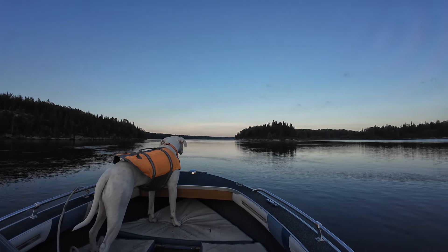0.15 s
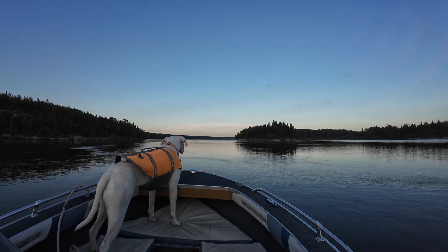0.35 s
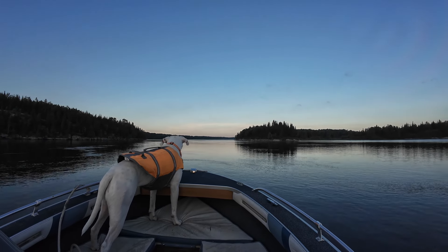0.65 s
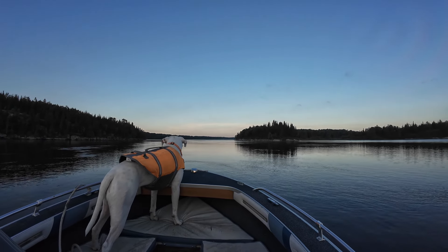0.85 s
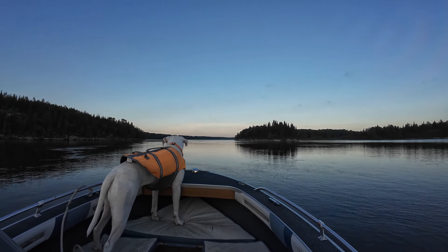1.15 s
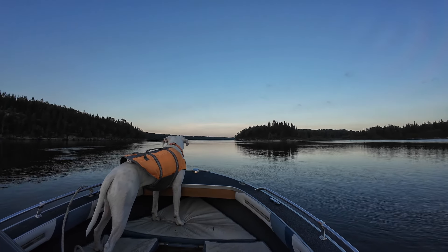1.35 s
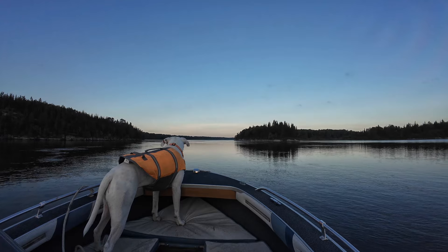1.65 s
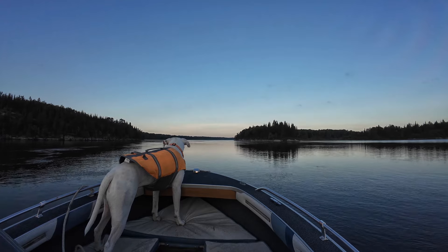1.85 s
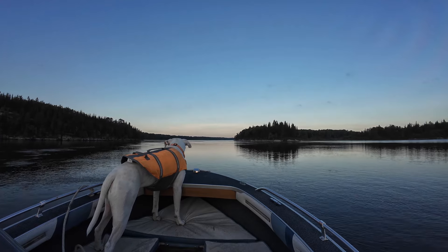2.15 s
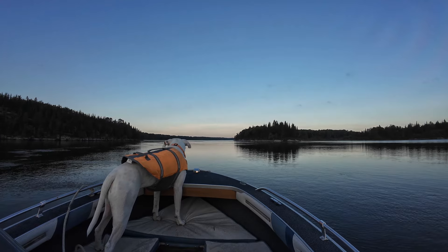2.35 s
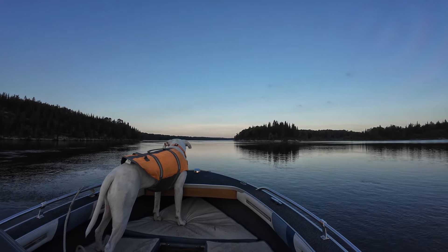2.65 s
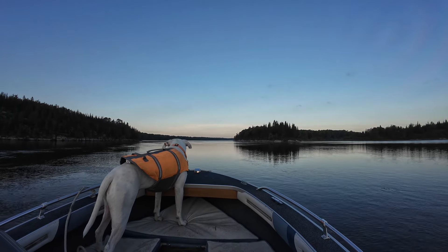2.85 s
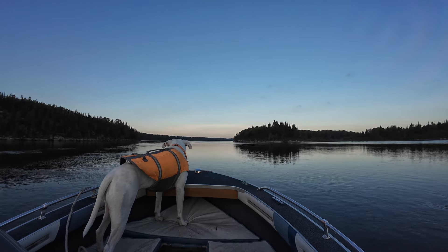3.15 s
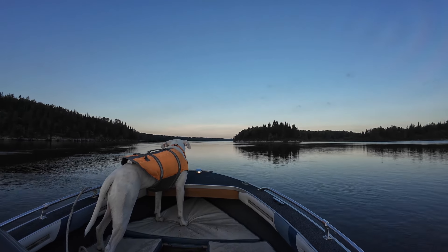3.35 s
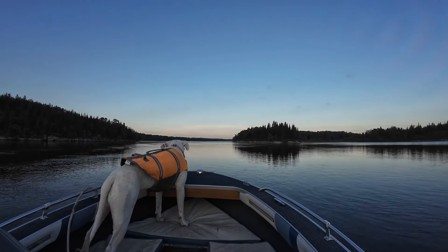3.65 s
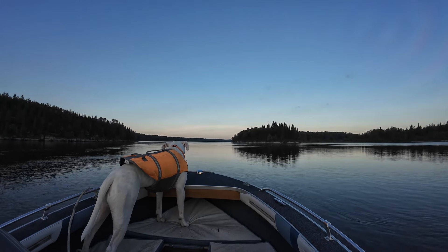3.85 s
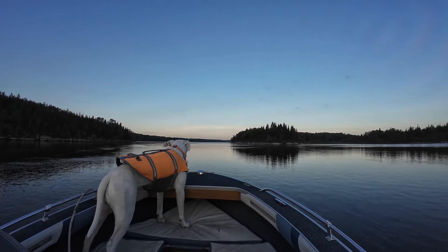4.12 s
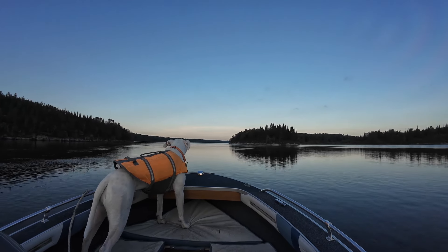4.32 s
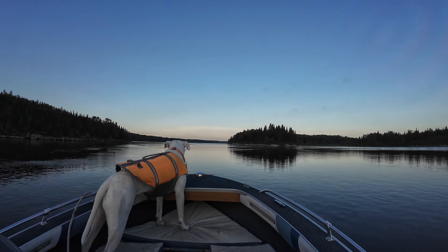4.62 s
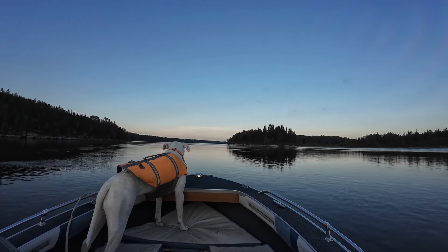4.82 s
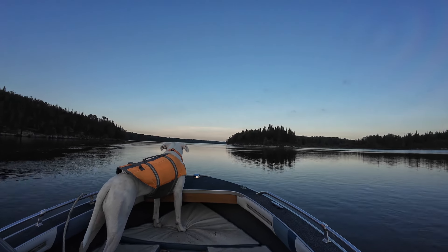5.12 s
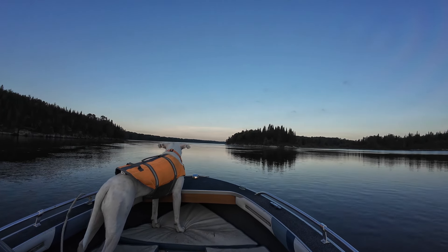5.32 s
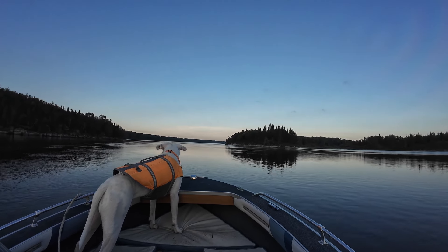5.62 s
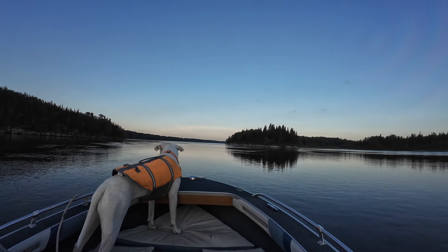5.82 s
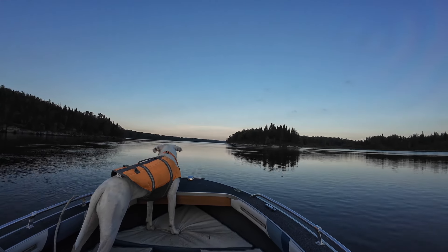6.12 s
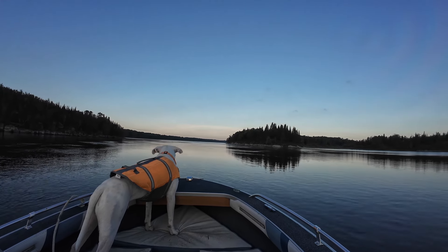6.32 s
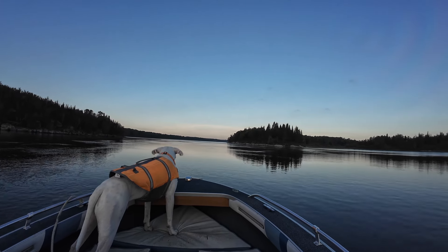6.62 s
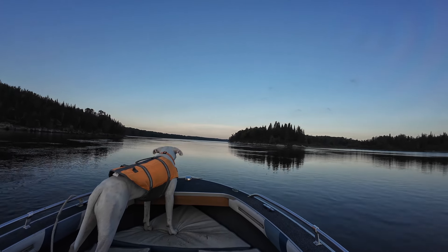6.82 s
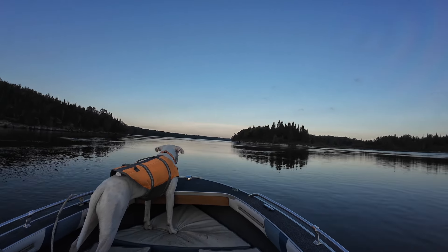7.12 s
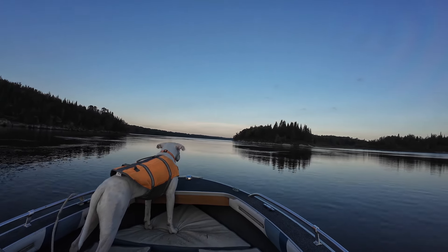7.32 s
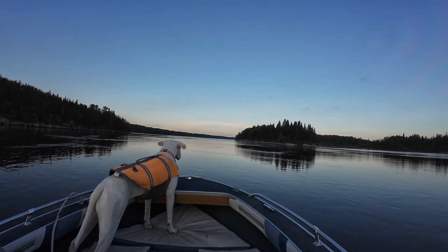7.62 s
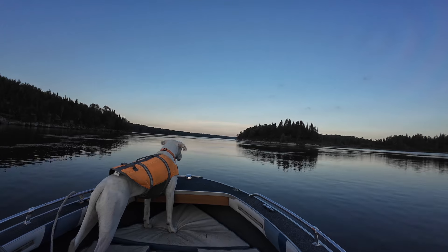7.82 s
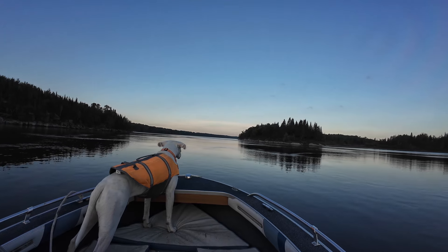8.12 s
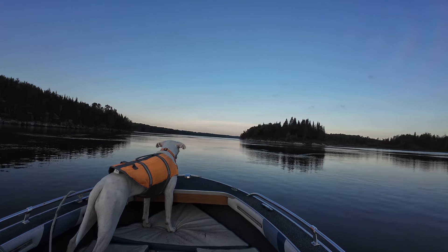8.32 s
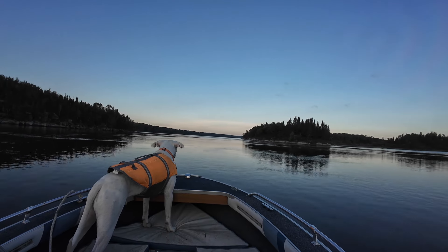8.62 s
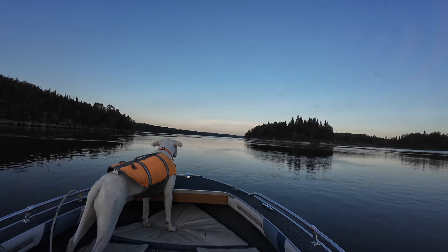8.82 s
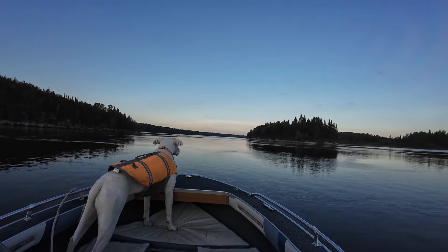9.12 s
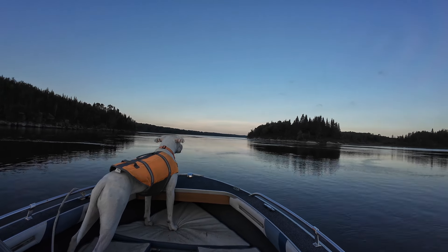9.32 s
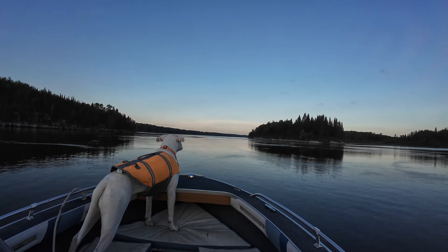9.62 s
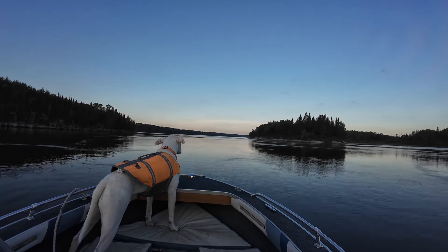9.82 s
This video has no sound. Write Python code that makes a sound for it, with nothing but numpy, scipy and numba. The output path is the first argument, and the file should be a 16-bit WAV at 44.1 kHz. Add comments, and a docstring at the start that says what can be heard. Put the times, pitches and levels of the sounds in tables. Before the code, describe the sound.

Wind buffets the microphone on a small boat as its outboard engine hums, rises in pitch and levels off, with water rushing past.

```python
"""Small outboard boat on a calm lake

The motor's firing tone climbs as the throttle opens, and a hull panel hums along at low speed.
Hull wash and spray hiss over the low roar of the wake, with one splash at the bow. Head wind
rumbles and pops on the microphone amidships; motor and water dip under the hardest gusts,
and a limiter holds the peaks."""
import sys
import numpy as np
from scipy import signal
from scipy.fft import rfft, irfft, next_fast_len
from scipy.io import wavfile
from scipy.ndimage import uniform_filter1d
from numba import njit

SR = 44100
rng = np.random.default_rng(int(sys.argv[2]) if len(sys.argv) > 2 else 0)


def waveform_to_disk(signal):
    """Save audio, clipped to [-1, 1], as 16-bit WAV at the path in sys.argv[1]."""
    frames = np.transpose(np.atleast_2d(signal))
    scaled = np.clip(frames, -1, 1) * 32767
    samples = np.round(scaled).astype(np.int16)
    wavfile.write(sys.argv[1], SR, samples)


N = 439236

# water hiss along the hull: t/s, wash/dB, spray/dB
HISS_LEVELS = [(0.0, -38, -56), (0.02, -36.5, -54), (0.05, -38, -53), (0.14, -29.5, -49),
               (0.19, -38.5, -58), (0.27, -42.5, -60), (0.33, -33.5, -52), (0.39, -38, -56),
               (0.44, -32, -50.5), (0.91, -33.5, -48), (2.61, -35, -48.5), (3.41, -36.5, -51.5),
               (3.55, -46, -60), (3.58, -41, -53), (3.66, -34.5, -50), (3.72, -39, -53.5), (3.94, -34, -49),
               (3.96, -34.5, -48), (4.41, -34, -51.5), (4.47, -36.5, -49), (4.52, -41, -56),
               (4.55, -40, -50), (4.58, -39, -55), (4.66, -43, -61), (4.82, -44.5, -53.5), (4.85, -43, -53),
               (4.88, -45, -58), (4.94, -37, -49), (5.1, -39, -49), (5.13, -37, -50), (5.16, -40, -54),
               (5.27, -42, -58), (5.35, -46, -52), (5.41, -33.5, -47), (5.6, -37.5, -47.5),
               (5.63, -41, -50.5), (5.66, -39, -59), (5.69, -40, -48), (5.77, -36, -45.5),
               (6.02, -37, -45.5), (6.13, -34, -43.5), (8.57, -36, -44.5), (9.93, -35.5, -47.5),
               (9.96, -32, -42)]


def motor():
    """Multiples of the firing rate, wavering with the load on the propeller, plus a humming hull panel."""
    # the throttle opening: t/s, firing rate/Hz, firing tone/dB, octave/dB
    throttle = [(0.0, 87.3, -11.5, -34), (0.4, 89.7, -16, -27.5), (0.8, 92, -15.5, -32),
                (1.2, 92.4, -20.5, -34), (1.6, 93.9, -17, -37), (2.0, 94.7, -15, -42),
                (2.4, 98.8, -16, -46), (2.8, 106.5, -15, -39), (3.2, 110.5, -14.5, -47),
                (3.4, 110.4, -14.5, -38), (3.6, 113, -13.5, -42), (4.0, 117.3, -13, -48),
                (4.4, 120.1, -14, -46), (4.6, 120.5, -27, -38), (4.8, 119.2, -39, -33),
                (5.0, 123, -9.5, -47), (5.2, 124.3, -13, -34.0), (5.6, 126, -14, -36),
                (6.0, 126.3, -12.5, -27.5), (6.4, 126.6, -10.5, -28.5), (6.8, 126.9, -9.5, -27.0),
                (7.2, 127.4, -9, -24.5), (7.6, 127, -10.5, -32), (8.0, 127, -11.0, -34),
                (8.4, 128.7, -11.5, -30.5), (8.8, 128.4, -12.5, -28), (9.2, 128.2, -12, -29.5),
                (9.6, 128.7, -17, -28.5), (9.96, 127.4, -14.5, -21.5)]
    # upper harmonics: multiple of the firing rate, level against the firing tone/dB
    overtones = [(6, -38.5), (7, -36.5), (8, -43), (9, -54), (12, -39.5)]
    # panel hum, fading as the boat speeds up: t/s, f/Hz, level/dB
    panel_hum = [(0, 200, -58), (.45, 202, -30.5), (.7, 205, -31.5), (1.0, 207, -29.5), (1.35, 208, -32),
                 (1.6, 210, -41), (9.96, 210, -92)]
    firing_hz, firing_db, octave_db = curves(throttle)
    phase = 2 * np.pi * np.cumsum(firing_hz * (1 + .00308 * wander(6))) / SR
    harmonics = [(1, firing_db), (2, octave_db), (3, -40)]  # the third does not follow the throttle
    harmonics += [(k, firing_db + db) for k, db in overtones]
    tone = sum(undb(db + 1.7 * wander(25)) * np.sin(k * phase + rng.uniform(0, 2 * np.pi))
               for k, db in harmonics)
    panel_hz, panel_db = curves(panel_hum)
    hum = undb(panel_db) * np.sin(2 * np.pi * np.cumsum(panel_hz) / SR)
    return np.sqrt(2) * (undb(.72 * gust_dip_db()) * tone + hum)


def wind():
    """Eddies over the microphone port: a deep rumble and a quicker, lumpy flutter."""
    # head wind gusts: t/s, rumble/dB, flutter/dB
    gusts = [(0.0, -11.5, -18.5), (0.16, -10, -19), (0.19, -7.5, -27), (0.61, -20, -22), (0.67, -3, -23.5),
             (0.83, -26, -23), (1.05, -32, -24.5), (1.11, -24, -21), (1.22, -34, -24), (1.33, -20, -24),
             (1.69, -35, -25.5), (1.77, -13, -25), (1.8, -21, -23), (1.86, -1.5, -18), (1.88, -25, -24),
             (2.0, -27, -19.5), (2.08, -8, -24.5), (2.22, -32, -25.5), (2.38, -19, -21), (2.44, -24, -21.5),
             (2.8, -20, -23.5), (2.86, -28, -22), (3.27, -12.5, -18.5), (3.33, -30, -17.5),
             (3.38, -12, -20), (3.69, -32, -19.5), (3.74, -12.5, -20), (3.8, -26, -21.5),
             (3.85, -12.5, -16), (3.91, -21.5, -21.5), (4.91, -16, -16.5), (5.1, -24, -20),
             (5.13, -19, -12), (5.38, -16, -22.5), (5.57, -13.5, -20), (5.82, -21, -24), (5.88, -13, -21),
             (5.94, -23, -21), (5.99, -10.5, -22), (6.18, -16, -20.5), (6.27, -8, -18), (6.38, -23, -28),
             (6.43, -22, -19.5), (6.66, -19, -20.5), (6.82, -13, -22), (6.9, -34, -14.5),
             (7.02, -17, -19.5), (9.32, -29, -19.5), (9.46, -33, -22), (9.57, -21, -19.5), (9.96, -27, -19)]
    # colour of the rumble and of the flutter: f/Hz, level/dB
    rumble_eq = [(12, -18), (25, -1), (45, 1.5), (75, 2), (120, -5.5), (200, -47)]
    flutter_eq = [(40, -13), (80, 0), (160, 1), (230, -6), (400, -13.5), (700, -17.5), (1300, -30)]
    rumble_db, flutter_db = curves(gusts)
    rumble = undb(rumble_db) * flicker_noise(rumble_eq, shared_db=2, own_db=-1.5, rate_hz=19, count=3)
    flutter = undb(flutter_db) * flicker_noise(flutter_eq, shared_db=2, own_db=1.3, rate_hz=55, count=3)
    return rumble + flutter


def wind_pops():
    """Pressure builds on the diaphragm, collapses in one crackling swing and settles; snaps are spikes."""
    # pops: centre t/s, body gain/dB, swing f/Hz, crackle/dB
    pops = [(1.77, -6.5, 308, -38), (1.851, -7.5, 260, -38), (2.369, -2.5, 335, -37),
            (3.226, -6.5, 352, -33), (3.251, -2.5, 300, -37), (3.276, 0.5, 346, -23.5),
            (3.435, 1, 296.6, -27), (3.492, -2, 330, -32), (3.513, -4, 260, -28), (3.539, -0.5, 360, -30),
            (3.602, 3, 274, -34), (3.705, 6, 239, -31), (3.75, 4, 414, -25), (3.836, -8, 341.4, -29),
            (3.849, -3.5, 436, -36), (3.866, -5, 342, -28), (4.046, 1, 312, -26), (4.426, 3, 289.3, -34),
            (4.456, -13, 351, -29.5), (4.508, 4, 348.5, -28), (4.58, 2, 372, -18.5), (4.602, -3, 360, -25),
            (4.656, -3.5, 283, -26), (4.68, -8, 350, -42), (4.697, -7, 390, -35), (4.752, -2, 310.4, -23.5),
            (4.791, -4, 290, -35), (4.814, -3, 420, -25), (4.832, -13.5, 320, -38), (4.876, 3.5, 285, -24),
            (4.929, -8, 420, -29), (4.958, -11, 370, -32), (4.999, -1.5, 321, -28), (5.124, -6, 400, -25),
            (5.134, 7.5, 420, -25), (5.155, -7, 291.3, -31), (5.196, -3, 490, -24), (5.234, -17, 394, -33),
            (5.271, -6, 410, -25), (5.317, -1, 260, -26), (5.534, 0.5, 280.5, -30), (5.564, -3, 390, -33),
            (5.596, -3, 280.2, -28), (5.637, -1.5, 380, -27), (5.656, -10.5, 329.2, -25),
            (5.728, -3, 299.7, -28), (5.854, -2, 289.4, -33), (5.941, -7, 330, -30), (5.991, 1, 340, -34),
            (6.036, -3, 348, -32)]
    # dry snaps inside the hardest gusts: t/s, gain/dB
    snaps = [(3.277, -8), (3.493, 8), (3.539, 4), (4.577, -9), (4.587, 9), (4.625, 6), (4.657, -8),
             (4.695, 8), (4.753, -6), (4.811, 2.5), (4.886, 6), (4.944, -0.5), (5.135, -10), (5.195, 10.5),
             (5.237, 5), (5.272, -8), (5.309, -1.5), (5.317, -16), (5.654, 6.5)]
    out = np.zeros(N)
    t = np.arange(-SR // 30, SR // 30) / SR
    shapes = rng.uniform(-1, 1, (len(pops), 3))
    rasp = unit_rms(bandpass(bandpass(rng.standard_normal(N), 450, 1900), 450, 1900))
    for (at, db, hz, crackle_db), (side, lean, tilt) in zip(pops, shapes):
        fade_s = .004 * (1 + .5 * lean * np.sign(t))  # build-up and settling differ in length
        collapse = -np.tanh(6 * hz * t) * np.exp(-np.abs(t) / fade_s)
        swing = np.sin(2 * np.pi * hz * t + 2.9 * tilt) * np.exp(-(hz * t / .65) ** 2)
        body = np.sign(side) * undb(db) * (.8 * collapse - .6 * swing)
        crackle = rasp[int(at * SR):][:len(t)] * np.exp(-(t / .0045) ** 2)
        add_centred(out, at, body + undb(crackle_db) * crackle)
    spike = np.exp(-np.hypot(t, .00009) / .0003)
    for at, db in snaps:
        side = -1 if out[int(at * SR)] > 0 else 1  # a snap kicks against the swing it lands on
        add_centred(out, at, side * undb(db) * spike)
    return out


def wake():
    """Churned water and exhaust bubbles make a low roar."""
    # swell of the roar: t/s, level/dB
    swell = [(0.0, -27.5), (0.3, -28.5), (0.61, -26.5), (1.14, -29.5), (4.82, -21.5), (5.55, -23),
             (9.23, -22.5), (9.96, -22.5)]
    # colour of the roar: f/Hz, level/dB
    roar_eq = [(100, -16), (180, -2.5), (260, -15), (420, -11), (700, -19.5), (1200, -31), (2000, -34)]
    roar_db = curves(swell)[0] + .7 * gust_dip_db()
    return undb(roar_db) * flicker_noise(roar_eq, shared_db=.7, own_db=1, rate_hz=35)


def hull_wash():
    """Water rushes along the hull, with fine spray hissing on top."""
    # colour of the wash and of the spray: f/Hz, level/dB
    wash_eq = [(700, 6), (1200, 7), (1900, 0.5), (3000, -4), (4500, -12.5), (6300, -18), (7000, -23)]
    spray_eq = [(3240, -3), (5500, 0), (6400, -2.5), (7100, -8), (7800, -2.5), (8600, -6.5), (10200, -4),
                (11200, -8), (12400, -6.5), (13100, -0.5), (13900, -6), (14800, -13), (15500, -18)]
    wash_db, spray_db = curves(HISS_LEVELS)
    wash = undb(wash_db) * flicker_noise(wash_eq, shared_db=.7, own_db=.8, rate_hz=18)
    spray = undb(spray_db) * flicker_noise(spray_eq, shared_db=.7, own_db=.7, rate_hz=20)
    return wash + spray


def bow_splash():
    """One bright splash at the bow, with the plink of a droplet inside it."""
    # splash envelope: t/s, level/dB
    burst = [(0, -90), (3.86, -70), (3.91, -40), (3.97, -41), (4.06, -45), (4.12, -75), (9.96, -90)]
    # the plink: t/s, starting f/Hz, peak/dB, decay/s
    droplet = (4.008, 2620, -31, .007)
    splash_db = curves(burst)[0] + 2.5 * wander(60)
    splash = undb(splash_db) * unit_rms(bandpass(rng.standard_normal(N), 2300, 3900))
    at, hz, db, decay = droplet
    t = np.maximum(np.arange(N) / SR - at, 0)
    envelope = undb(db) * t / decay * np.exp(1 - t / decay)
    return splash + envelope * np.sin(2 * np.pi * hz * t * (1 - 1.2 * t))


def gust_dip_db():
    """The dip under a gust: how far the wash sinks below its usual -36 dB."""
    return np.minimum(curves(HISS_LEVELS)[0] + 36, 0)


def undb(db):
    return 10 ** (np.asarray(db) / 20)


def unit_rms(x):
    return x / np.sqrt(np.mean(x ** 2))


def curves(table):
    """One automation curve, a value per sample, for each column after the time."""
    times, *columns = np.transpose(table)
    return [np.interp(np.arange(N) / SR, times, column) for column in columns]


def wander(rate_hz):
    """Random sample-and-hold, smoothed twice, at unit RMS."""
    hold = int(SR / rate_hz)
    steps = np.repeat(rng.standard_normal(N // hold + 1), hold)
    return unit_rms(uniform_filter1d(uniform_filter1d(steps, hold), hold)[:N])


def flicker_noise(eq, shared_db, own_db, rate_hz, count=5):
    """Noise coloured by eq, in overlapping bands that flicker together and alone; unit RMS."""
    size = next_fast_len(N)
    octave = np.log2(np.maximum(np.arange(size // 2 + 1) * SR / size, 1))
    eq_hz, eq_db = np.transpose(eq)
    eq_octave = np.log2(eq_hz)
    colour = undb(np.interp(octave, eq_octave, eq_db, left=-120, right=-120))
    spectrum = rfft(rng.standard_normal(size)) * colour
    centres = np.linspace(eq_octave[0], eq_octave[-1], count)
    shared = shared_db * wander(rate_hz)
    bands = (irfft(spectrum * np.interp(octave, centres, row), size)[:N] for row in np.eye(count))
    return unit_rms(sum(band * undb(shared + own_db * wander(rate_hz)) for band in bands))


def bandpass(x, lo_hz, hi_hz):
    return signal.sosfilt(signal.butter(2, [lo_hz, hi_hz], "band", fs=SR, output="sos"), x)


def add_centred(out, centre_s, grain):
    start = int(centre_s * SR) - len(grain) // 2
    out[start:start + len(grain)] += grain


@njit
def peak_envelope(x, attack_s, release_s):
    """Follows the peaks: quick to rise, slow to fall."""
    out, level = np.empty(len(x)), 0.
    for i in range(len(x)):
        lag_s = attack_s if abs(x[i]) > level else release_s
        level += (abs(x[i]) - level) / (lag_s * SR)
        out[i] = level
    return out


def scene():
    """Motor, water and wind in mono."""
    return (motor() + wake() + hull_wash() + bow_splash() + wind() + wind_pops())[None]


def record(dry):
    """A limiter pulls peaks down, a soft clip rounds the last tips, and a steep low-pass cuts the top."""
    ceiling, top_hz = .97, 15650
    envelope = peak_envelope(dry[0], attack_s=.0006, release_s=.02)
    limited = dry * ceiling / np.maximum(envelope, ceiling)
    rounded = limited / (1 + limited ** 6) ** (1 / 6)
    return signal.sosfilt(signal.ellip(10, .2, 70, top_hz, fs=SR, output="sos"), rounded)


dry = scene()
out = record(dry)
waveform_to_disk(out)
```